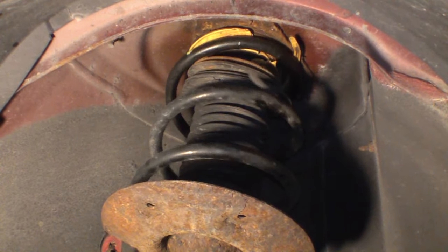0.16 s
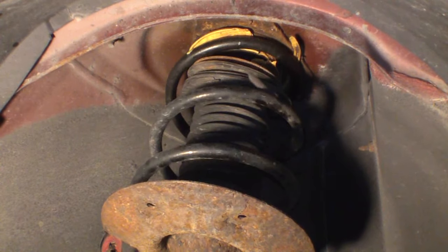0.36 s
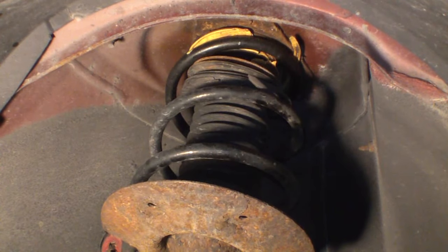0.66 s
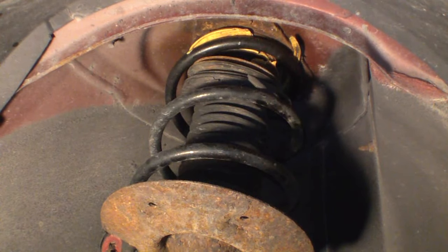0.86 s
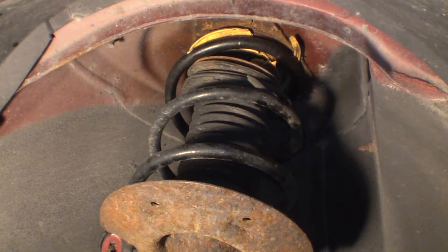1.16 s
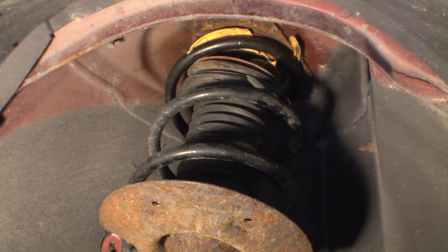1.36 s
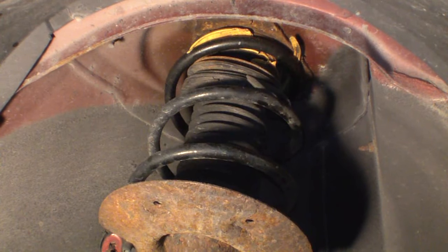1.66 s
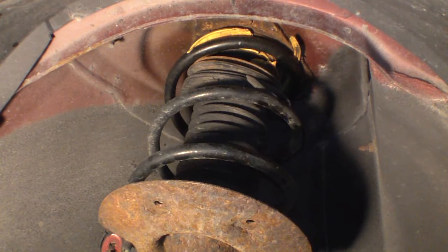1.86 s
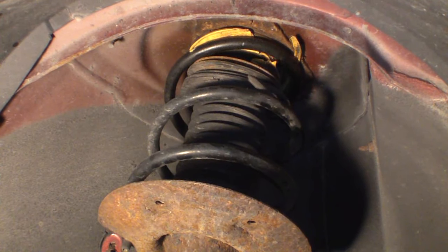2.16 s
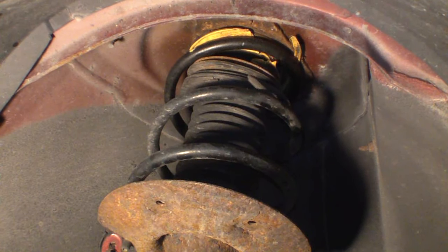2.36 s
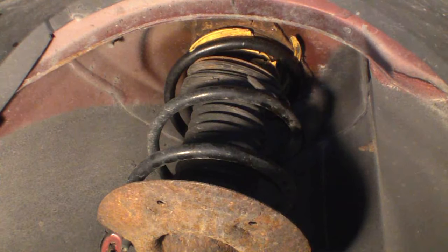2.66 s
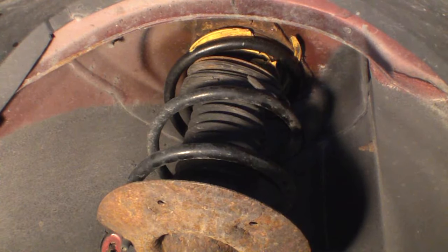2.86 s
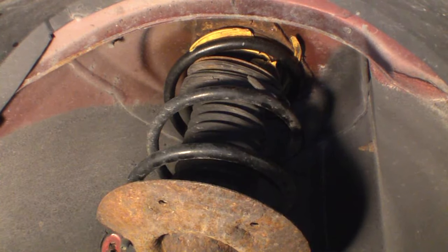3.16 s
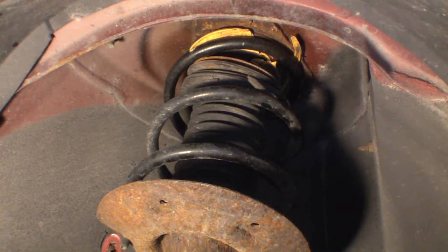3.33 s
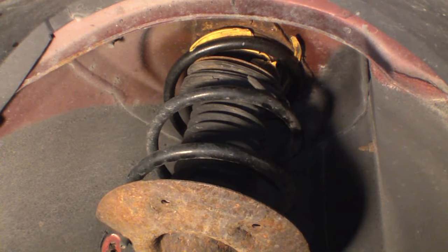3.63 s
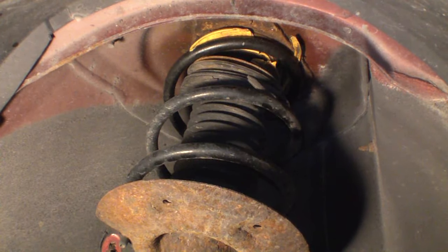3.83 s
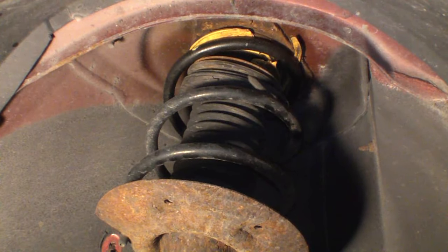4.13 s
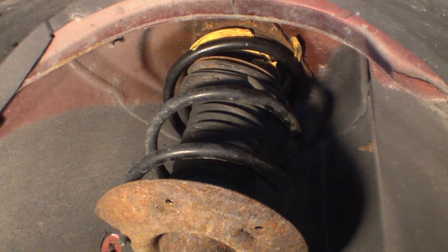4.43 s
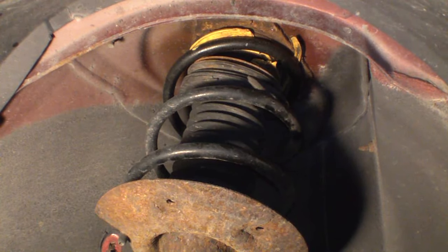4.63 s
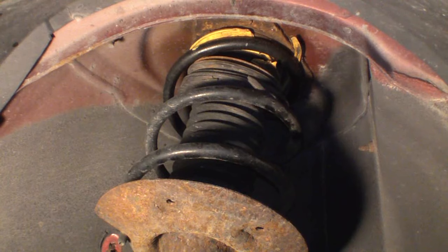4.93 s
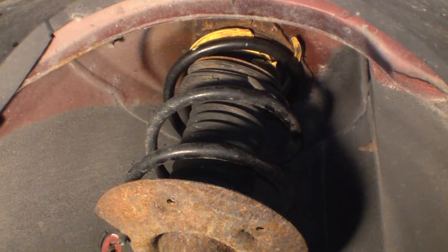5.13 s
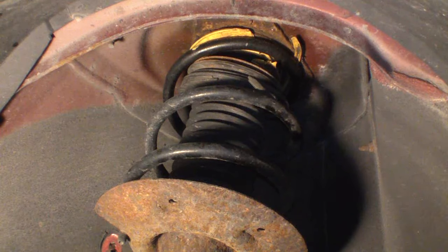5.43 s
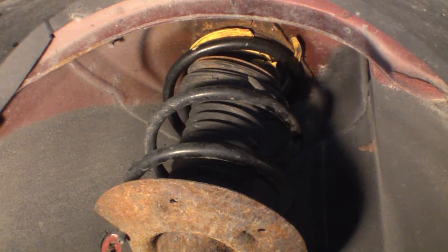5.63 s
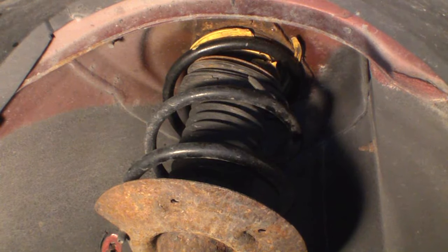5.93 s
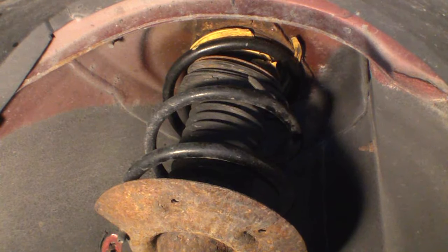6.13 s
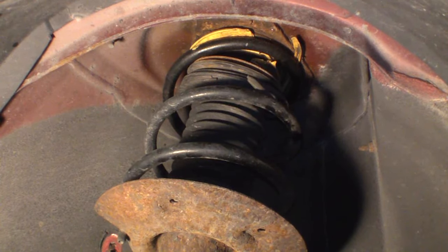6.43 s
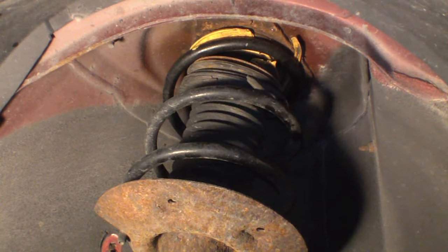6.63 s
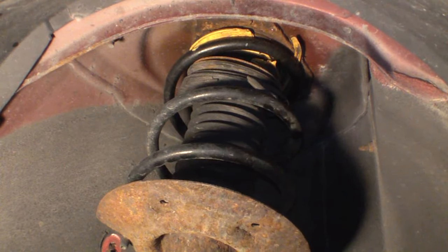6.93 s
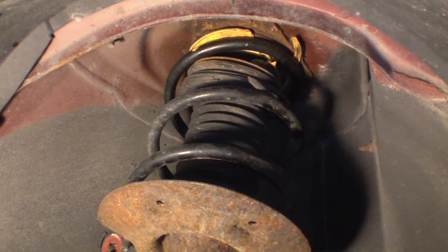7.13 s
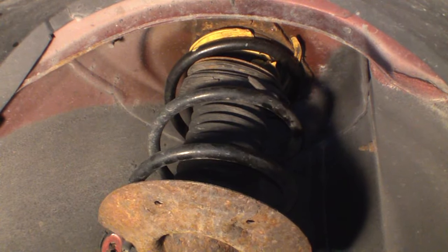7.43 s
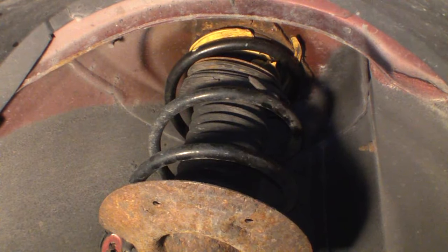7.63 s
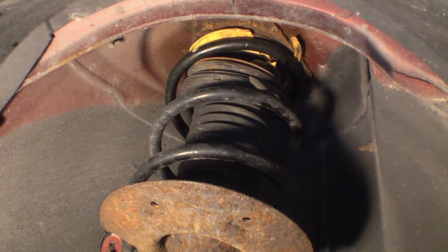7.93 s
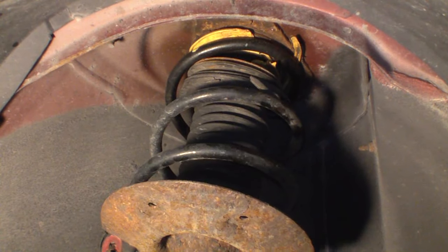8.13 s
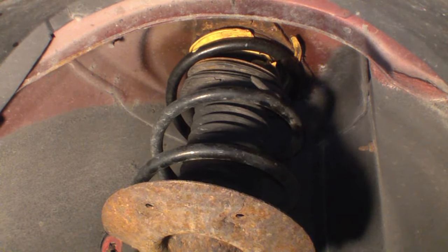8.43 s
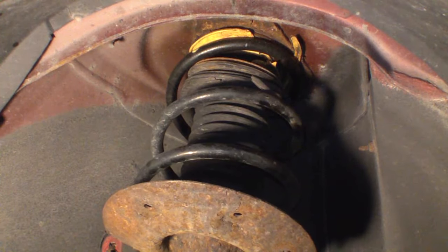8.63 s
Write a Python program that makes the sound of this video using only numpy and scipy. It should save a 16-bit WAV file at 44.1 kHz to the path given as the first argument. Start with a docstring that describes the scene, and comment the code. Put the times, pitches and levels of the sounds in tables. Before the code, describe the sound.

Close to a worn, rusty suspension strut, a car body is jolted: a heavy metal slam with deep lingering boom and bright rattling, then seven quick tool raps on steel. Two more slams follow near two and four seconds, then a loud snap and scattered ticks over faint rumble and hiss in a garage.

```python
"""A worn strut mount slams three times as a car body is shoved by hand in a garage, heard close up.
Each slam is a crash of shaped noise over ringing panel modes; the jolts swell low body modes into a boom
and set a loose part rattling in bright clicks with duller answers. A tool raps on steel, small parts tick
and thud as noise bursts, and sparse echoes follow. Behind lie lumpy rumble, a wavering hum and two-port hiss."""
import sys
import numpy as np
from scipy import signal
from scipy.fft import rfft, irfft, next_fast_len
from scipy.io import wavfile
from scipy.ndimage import uniform_filter1d

SR = 44100
rng = np.random.default_rng(int(sys.argv[2]) if len(sys.argv) > 2 else 0)


def materialize(psi):
    """Save the field psi as 16-bit PCM at rate SR to the path in sys.argv[1].

    A 1-D psi becomes a single channel; in a 2-D psi each row is a channel.
    """
    bounded = np.clip(np.atleast_2d(psi).T, -1, 1)
    quanta = np.round(bounded * 32767).astype(np.int16)
    wavfile.write(sys.argv[1], SR, quanta)


N = 387198  # length [samples]


def amp(db):
    """Decibels to amplitude ratio."""
    return 10 ** (np.asarray(db) / 20)


def evened(x):
    """Scales a sound to rms 1."""
    return x / np.sqrt(np.mean(x ** 2) + 1e-20)


def read(points, hz):
    """Reads a (frequency, value) table along a logarithmic frequency axis."""
    f, value = np.transpose(points)
    return np.interp(np.log(hz + 1), np.log(f + 1), value)


def curve(rows):
    """Straight lines between (time, value) points over the whole scene."""
    return np.interp(np.arange(N) / SR, *np.transpose(rows))


def add(mix, s, sound):
    """Adds a sound into the mix at s seconds, cut off at the end of the mix."""
    part = mix[round(s * SR):][:len(sound)]
    part += sound[:len(part)]


def band(x, lo_hz, hi_hz, order=2):
    """Butterworth band-pass."""
    sos = signal.butter(order, [lo_hz, min(hi_hz, SR / 2.1)], "bandpass", fs=SR, output="sos")
    return signal.sosfilt(sos, x)


def white(n):
    """White noise."""
    return rng.standard_normal(n)


def coloured(spectrum, n):
    """Steady noise of rms 1 with the given spectrum."""
    m = next_fast_len(n)
    shape = amp(read(spectrum, np.fft.rfftfreq(m, 1 / SR)))
    return evened(irfft(rfft(white(m)) * shape, m)[:n])


def dying(x, t60s):
    """Lets every frequency of a sound fade at its own t60."""
    hz, t, z = signal.stft(x, SR, nperseg=256)
    fade = amp(-60 * t / read(t60s, hz)[:, None])
    return signal.istft(z * fade, SR, nperseg=256)[1][..., :x.shape[-1]]


def struck(modes, length_s, contact_s, scatter, bed_db):
    """Modes as clusters of close partials, rung by a chattering contact over a bed of unresolved ones; peak 1."""
    t = np.arange(round(length_s * SR)) / SR
    hz, db, t60 = np.transpose(modes)[:, :, None, None]
    detune = 1 + scatter * rng.standard_normal((len(modes), 7, 1))
    ring = (amp(db - 60 * t / t60) * np.sin(2 * np.pi * hz * detune * t)).sum(axis=1)
    contact = white(800) * np.exp(-t[:800] / contact_s)
    rung = signal.oaconvolve(ring, contact[None], axes=1)[:, :len(t)]
    # every mode keeps its own strength whatever the contact noise does
    ring = np.linalg.norm(ring, axis=1) / np.linalg.norm(rung, axis=1) @ rung
    tops = [(modes[0][0] / 2, -40)] + [mode[:2] for mode in modes]
    bed = coloured(tops, len(t)) * amp(bed_db - 60 * t / (contact_s * 7 + np.median(t60)))
    sound = ring / abs(ring).max() + bed
    return sound / abs(sound).max()


# Colour of the hiss: (frequency [Hz], relative level per Hz [dB])
HISS_COLOUR = [(59, -10), (100, 0.5), (184, -10), (281, -15), (420, -18.5), (2320, -31), (13700, -34.5),
               (15500, -36)]
# Left-right likeness of the hiss: (frequency [Hz], correlation [0-1])
HISS_LIKENESS = [(60, 0.84), (380, 0.79), (2380, 0.56), (15000, 0.13)]
HISS_DB = -42  # rms


def hiss():
    """Noise with drifting patches of level, partly shared by the two ports."""
    frames, hz = N // 256 + 5, np.fft.rfftfreq(1024, 1 / SR)
    a, b, c, d, patches = rng.standard_normal((frames, 513, 5)).T
    patches = uniform_filter1d(patches, size=12, axis=0)  # smooth across frequency
    patches = evened(uniform_filter1d(patches, size=10, axis=1))  # and across time
    same = np.clip(read(HISS_LIKENESS, hz), -1, 1)[:, None]
    left = a + 1j * b
    right = same * left + np.sqrt(1 - same ** 2) * (c + 1j * d)
    z = np.array([left, right]) * amp(read(HISS_COLOUR, hz)[:, None] + 1.6 * patches)
    return amp(HISS_DB) * evened(signal.istft(z, nperseg=1024, noverlap=768)[1][:, :N])


# Colour of the rumble: (frequency [Hz], relative level per Hz [dB])
RUMBLE_COLOUR = [(12, -4), (26, -6.5), (42, -17), (50, -6.5), (56, 1.5), (64, -5), (86, -4.5), (105, -26),
                 (250, -81)]
# Rise and fall of the rumble: (time [s], level [dB])
RUMBLE_LEVEL = [(0, -26), (.2, -21.5), (1.5, -33), (5.5, -38.5), (6.85, -33.5), (8.4, -39)]


def rumble():
    """Low noise, naturally lumpy because it is so narrow, under a slow level curve."""
    return amp(curve(RUMBLE_LEVEL)) * coloured(RUMBLE_COLOUR, N)


HUM_HZ, HUM_DB, HUM_FIFTH_DB = 233.6, -51, -9.5  # mean pitch, mean rms level, fifth against the hum


def hum():
    """A tone and the fifth above it, wavering together in pitch and level."""
    waver = evened(band(white(N), 0.49, 6.0, order=1))
    half_phase = np.pi * np.cumsum(HUM_HZ + 1.87 * waver) / SR
    tones = np.sin(2 * half_phase) + amp(HUM_FIFTH_DB) * np.sin(3 * half_phase)
    return amp(HUM_DB + 1.6 * waver) * np.sqrt(2) * tones


# Rustles: (time [s], level [dB], half length [s])
RUSTLE_STROKES = [(3.53, -51, 0.063), (6.29, -52.5, 0.033), (6.963, -50.5, 0.16), (7.772, -50, 0.044),
                  (8.26, -49.5, 0.11)]


def rustles():
    """Grainy mid-band noise in soft bell-shaped strokes."""
    grain = amp(2.8 * evened(band(white(N), 26, 170, order=1)))
    t = np.arange(N) / SR
    strokes = sum(amp(db) * np.exp(-((t - s) / half) ** 2) for s, db, half in RUSTLE_STROKES)
    return strokes * evened(grain * band(white(N), 670, 6400))


# Echo decay of the garage: (frequency [Hz], t60 [s])
GARAGE_T60 = [(200, 1), (1000, 0.31), (4000, 0.32), (12000, 0.3)]


def garage(x):
    """Sparse echoes of random sign, partly different at the two ports; the lows linger longest."""
    taps = np.zeros((2, 16000))
    at = np.arange(200, 15980, 20) + rng.integers(0, 20, (2, 789))
    np.put_along_axis(taps, at, rng.choice([-1., 1.], at.shape), 1)
    shared, apart = dying(band(taps, 150, 11600, order=1), GARAGE_T60)
    # close ports differ only at short wavelengths
    side = amp(-5) * band(apart, 3500, 16000, order=1)
    pair = np.array([shared + side, shared - side]) / np.linalg.norm(shared)
    return signal.oaconvolve(x[None], pair, axes=1)[:, :N]


def ports(x):
    """Tiny case reflections colour the treble differently at the two ports; the left is a little louder."""
    case = white(90) * np.exp(-np.arange(90) / 25)  # decay in samples
    treble = band(np.convolve(x, case / np.linalg.norm(case))[:N], 5000, 18000)
    side = amp(-9.5) * treble + amp(-31) * x
    return np.array([x + side, x - side])


# Ticks and snaps: (time [s], level at 2-7 kHz [dB], treble against it [dB])
TICK_EVENTS = [(0.07, -26.5, 3), (1.075, -30.5, 0.5), (1.9686, -43, 6), (2.0496, -27, -10),
               (2.977, -22, -5), (3.0958, -38.5, 3.5), (3.168, -40, -2), (3.2286, -46, 13),
               (3.331, -41, -11), (3.669, -36, 3), (3.782, -41.5, 7.5), (3.942, -27.5, 5),
               (4.0527, -18.5, 3.5), (4.69, -26, 0), (5.0386, -27.5, -2), (5.0765, -33, -24),
               (5.4046, -7, -6), (5.5205, -40, 14.5), (5.588, -34, 3), (5.6884, -27, 2.5), (5.7327, -39, 1),
               (5.83, -37, 7.5), (6.0245, -43.5, 12.5), (6.0494, -39.5, -2), (6.542, -52, 11.5),
               (6.616, -37, 3.5), (6.8542, -37.5, -5), (7.0762, -22, 5.5), (7.11, -26, -1),
               (7.718, -43, -1), (8.0706, -48, 13), (8.4396, -37, 2), (8.6644, -40, 4)]
# Ringing bracket: (frequency [Hz], relative level [dB], t60 [s])
BRACKET_MODES = [(1435, -3, 0.4), (3070, -5, 0.28), (3600, 2, 0.2), (4450, -1, 0.16), (5400, -7, 0.1)]
TICK_LOW_DB = -11  # low part against the 2-7 kHz part
CRACKLE_DB, CRACKLES_PER_S = -56, 12  # quietest crackle, mean rate
BRACKET_S, BRACKET_DB, BRACKET_SCATTER = 5.405, -9.5, .016  # scatter: relative detuning


def ticks():
    """Snaps of noise in three fading bands, faint random crackles, and a bracket rung by the loudest snap."""
    out, t = np.zeros(N), np.arange(9000) / SR
    for s, db, high_db in TICK_EVENTS:
        noise = white(len(t))
        low = amp(TICK_LOW_DB) * evened(band(noise, 400, 4300)) * amp(-60 * t / 0.091)
        # mid and treble each have a quick snap and a much weaker, longer tail
        mid = evened(band(noise, 2140, 7560)) * (amp(-60 * t / 0.032) + amp(-26 - 60 * t / 0.51))
        treble = evened(band(noise, 6000, 14000))
        high = amp(high_db) * treble * (amp(-60 * t / 0.027) + amp(-35 - 60 * t / 0.042))
        add(out, s, amp(db) * (low + mid + high))
    crackles = amp(CRACKLE_DB + 9 * rng.random(N)) * (rng.random(N) < CRACKLES_PER_S / SR)
    # every crackle shares the last tick's treble noise
    out += signal.oaconvolve(crackles, treble * amp(-60 * t / 0.025))[:N]
    add(out, BRACKET_S, amp(BRACKET_DB) * struck(BRACKET_MODES, 0.33, 0.0012, BRACKET_SCATTER, -10.5))
    return out


# Bumps that ring in one band: (time [s], level [dB], centre frequency [Hz], t60 [s])
THUD_EVENTS = [(.292, -12.5, 1130, 0.098), (2.049, -19.5, 910, 0.073), (2.7, -42, 1950, 0.28),
               (2.974, -19.5, 690, 0.11), (2.976, -29, 1870, 0.3), (4.058, -7.5, 705, 0.12),
               (4.115, -5.5, 1150, 0.03), (4.69, -25, 1230, 0.045), (4.88, -34, 206, 0.19),
               (5.332, -23, 350, 0.048), (5.778, -27, 4500, 0.034), (6.07, -41, 1170, 0.17),
               (6.617, -32.5, 706, 0.047), (6.78, -27.5, 25.8, 0.52), (7.077, -9.5, 6560, 0.028),
               (7.124, -27.5, 880, 0.092), (7.217, -31.5, 596, 0.052), (7.814, -24.5, 690, 0.13),
               (8.066, -42, 700, 0.21)]
THUD_SPREAD = 1.61  # band edges as a ratio to the centre


def thuds():
    """Fading noise in one band with a gentle start."""
    out, t = np.zeros(N), np.arange(12000) / SR
    for s, db, hz, t60 in THUD_EVENTS:
        body = evened(band(white(len(t)), hz / THUD_SPREAD, hz * THUD_SPREAD))
        rise = 1 - np.exp(-t / 0.0028)
        add(out, s, amp(db - 60 * t / t60) * rise * body)
    return out


# Tool raps: (time [s], level [dB])
RAP_EVENTS = [(1.1914, -3.5), (1.278, -4.5), (1.3417, -5.5), (1.4498, -5.5), (1.5446, -6.5), (1.5892, -10),
              (1.6427, -11.5)]
# Modes of the struck steel: (frequency [Hz], relative level [dB], t60 [s])
STEEL_MODES = [(343.5, -7.5, 0.6), (990, 4, 0.039), (1080, 5.5, 0.032), (1440, -1, 0.05), (1750, -2, 0.078),
               (2180, 3, 0.028), (2375, -3.5, .03), (3960, -2.5, 0.03), (4570, -3, 0.037),
               (5190, 0.5, 0.035), (5550, -2.5, 0.027), (12100, -34, .02)]
# Noisy tail of the struck plate: (frequency [Hz], t60 [s])
RAP_TAIL_T60 = [(600, 0.45), (2200, 0.17), (6000, 0.044)]
RAP_TAIL_DB, RAP_CRACK_DB, STEEL_SCATTER = -16, -10.5, .022  # scatter: relative detuning
RAP_BOUNCE_S, RAP_BOUNCE_DB = 0.0043, -16.5  # second landing, after and against the first


def raps():
    """A tool lands twice on one spot of steel: the same ring each time, a noisy tail and a crack of treble."""
    out, t = np.zeros(N), np.arange(2000) / SR
    same = struck(STEEL_MODES, .3, 0.0022, STEEL_SCATTER, -10)
    crack = amp(RAP_CRACK_DB - 60 * t / 0.029) * band(white(len(t)), 990, 16400)
    tail_colour = [(hz, db / 2) for hz, db, _ in STEEL_MODES]  # flatter than the ring
    for s, db in RAP_EVENTS:
        tail = amp(RAP_TAIL_DB) * dying(coloured(tail_colour, len(same)), RAP_TAIL_T60)
        ring = band(same + tail, 300, 16000)
        add(out, s, amp(db) * ring)
        add(out, s + RAP_BOUNCE_S, amp(db + RAP_BOUNCE_DB) * ring)
        add(out, s, amp(db) * crack)
    return out


def chatter():
    """Many faint uneven touches of the loose part while the body still shakes."""
    shake, t = np.zeros(N), np.arange(SR) / SR
    for s, db, *_ in BODY_JOLTS:
        add(shake, s, amp(db - 60 * t / 1.34))
    uneven = amp(2.5 * np.minimum(rng.exponential(1, N), 2.5))
    size = shake * uneven * (rng.random(N) < 220 / SR)  # about 220 touches a second
    kind, out = rng.integers(0, 4, N), np.zeros(N)
    for k in range(4):
        dull = band(struck(PANEL_ANSWER, .1, .002, .08, -6), 200, 2400, order=1)
        touch = dull + amp(-19) * struck(STEEL_CLICK, .1, .001, .015, -9)
        out += signal.oaconvolve(size * (kind == k), touch)[:N]
    return out


# Loose part knocking back, often about every 32 ms: (time [s], click level [dB])
RATTLE_KNOCKS = [(0.243, -5.5), (0.274, -13), (0.3075, -6), (0.3414, -7), (0.378, -41), (0.405, -20),
                 (0.426, -39), (0.441, -38), (0.459, -14), (0.482, -37), (0.504, -48), (0.5539, -15.5),
                 (0.586, -29), (0.6163, -28), (0.6487, -19.5), (0.6804, -24), (0.713, -56), (0.7446, -38),
                 (0.778, -30), (0.809, -46), (0.843, -63), (0.872, -34), (0.944, -56), (2.0763, -2),
                 (2.1092, -39), (2.1704, -21.5), (2.2036, -15), (2.2342, -49), (2.287, -39), (2.2981, -32),
                 (2.322, -30), (2.399, -38), (2.417, -47), (2.494, -59), (4.1518, -25), (4.184, -30),
                 (4.215, -30), (4.2805, -39), (4.316, -39), (4.3787, -47)]
# Small steel part that clicks: (frequency [Hz], relative level [dB], t60 [s])
STEEL_CLICK = [(4640, 0, 0.0052), (5480, 0.5, 0.01), (7680, -4, 0.024), (9100, 3.5, 0.016),
               (10960, 5.5, 0.021), (12760, 2.5, 0.044)]
# Duller panel behind it: (frequency [Hz], relative level [dB], t60 [s])
PANEL_ANSWER = [(350, -6.5, 0.2), (822, 6.5, 0.025), (1150, -2.5, 0.028), (1484, 5, 0.016),
                (2380, -6, 0.029), (3270, -0.5, 0.055), (3574, -1.5, 0.024), (5500, -9.5, 0.031)]
# the answer follows the click's level only in part (dB per dB) and fades after each jolt
ANSWER_DB, ANSWER_SHARE, ANSWER_FADE_DB_PER_S, ANSWER_LAG_S = -7.5, 0.28, 13.5, .002
PANEL_SCATTER = .017  # relative detuning, also for the slammed panels


def rattle():
    """A bright click on a small steel part; the duller panel behind it answers just after."""
    out, jolts = np.zeros(N), np.array([row[0] for row in BODY_JOLTS])
    for s, db in RATTLE_KNOCKS:
        since = s - jolts[jolts < s].max()  # seconds after the latest jolt
        answer_db = ANSWER_DB + ANSWER_SHARE * db - ANSWER_FADE_DB_PER_S * since
        add(out, s, amp(db) * struck(STEEL_CLICK, 0.076, 0.0015, 0.0028, -10.5))
        answer = struck(PANEL_ANSWER, 0.21, 0.0037, PANEL_SCATTER, -12)
        add(out, s + ANSWER_LAG_S, amp(answer_db) * answer)
    return out


# Low modes of the car body: (frequency [Hz], build-up [s], t60 [s])
BODY_MODES = [(53.8, 0.072, 2.25), (62.3, 0.087, 1.15), (93.4, 0.18, 3.29), (110, 0.047, 1.35),
              (125.9, 0.0024, 1.06), (147, 0.033, 2), (179.6, 0.008, 0.94), (346, 0.018, 0.85)]
# Jolts to the body: (time [s], loose-part chatter [dB], then the level of each body mode in turn [dB])
BODY_JOLTS = [(.225, -19, -3, -32, -6.5, -4.5, -16, -23, -15.5, -16.5),
              (0.538, -29, -8, -42, -30, -32, -24.5, -42, -29.5, -25),
              (2.099, -23.5, -3.5, -6, -14, -6.5, -16.5, -31, -20.5, -23),
              (4.08, -29.5, -4, -4.5, -17, -6, -9.5, -24, -19, -26),
              (7.751, -68, -21, -34, -34, -37, -42, -50, -44, -57)]


def boom():
    """Low body modes, fed through the mounts, swell before they fade; neighbours swing in opposition."""
    out, t = np.zeros(N), np.arange(110000) / SR
    for s, _, *levels in BODY_JOLTS:
        for k, ((hz, build, t60), db) in enumerate(zip(BODY_MODES, levels)):
            swell = (1 - np.exp(-t / build)) ** 2
            mode = amp(db - 60 * t / t60) * np.sin(2 * np.pi * hz * t)
            add(out, s, (-1) ** k * swell * mode)
    return out


# Slams: (time [s], crash level [dB], brightness [dB per octave], factor on the crash t60 [ratio],
#         panel ring level [dB], rise [s])
SLAM_EVENTS = [(.209, -10, 5, 0.52, -5.5, .0017), (2.072, -16, 3, 0.89, -2.5, 0.0051),
               (4.057, -12, 2.5, 0.46, -6, 0.0046)]
# Crash colour before each slam's brightness: (frequency [Hz], relative level per Hz [dB])
CRASH_COLOUR = [(76, -30), (130, 9.5), (183, -3), (595, -5), (657, -10.5), (771, -11.5), (4400, -35.5),
                (11300, -50), (15500, -41.5)]
# Crash decay before each slam's factor: (frequency [Hz], t60 [s])
CRASH_DECAY = [(150, 1.22), (700, 1.23), (1500, 0.84), (4000, 0.12), (12000, 0.033)]
# Ringing panels: (frequency [Hz], relative level [dB], t60 [s])
PANEL_MODES = [(235.7, 1.5, 0.75), (486, 4.5, 0.33), (583, 10, 0.23), (701, 3, 0.27), (780, -10, 0.25)]


def slams():
    """Broad crash of sheet metal, each band dying at its own speed, over ringing panels."""
    out, t, hz = np.zeros(N), np.arange(36000) / SR, np.geomspace(100, 16000, 40)
    for s, db, tilt_db, longer, ring_db, rise_s in SLAM_EVENTS:
        colour_db = read(CRASH_COLOUR, hz) + tilt_db * np.log2(hz / 500)
        noise = coloured(np.transpose([hz, colour_db]), len(t))
        # loose parts keep bumping, so the tail comes in lumps
        lumps = amp(4.5 * evened(band(white(len(t)), 15, 60)))
        tail = lumps * dying(noise, np.multiply(CRASH_DECAY, [1, longer]))
        burst = noise * amp(15 - 60 * t / 0.064)  # the parts grind together for a moment
        rise = 1 - np.exp(-(t / rise_s) ** 2)
        ring = struck(PANEL_MODES, len(t) / SR, 0.013, PANEL_SCATTER, -26.0)
        add(out, s, rise * (amp(db) * (tail + burst) + amp(ring_db) * ring))
    return out


def scene():
    """Direct sound at the two ports, plus garage echoes and hiss."""
    small = raps() + ticks() + thuds()
    loose = rattle() + chatter()
    heavy = slams()
    murmurs = rumble() + hum() + rustles()
    echoes = garage(amp(-13.0) * small + amp(-12.0) * loose + amp(-18.0) * heavy)
    return ports(small + loose + heavy + boom() + murmurs) + echoes + hiss()


def record(dry):
    """The input stage overloads smoothly at full scale; then a steep low-pass limits the band."""
    clipped = dry / (1 + dry ** 8) ** (1 / 8)
    low_pass = signal.firwin(255, 15400, window=("kaiser", 8), fs=SR)  # edge in Hz
    return signal.oaconvolve(clipped, low_pass[None], "same")


dry = scene()
out = record(dry)
materialize(out)
```